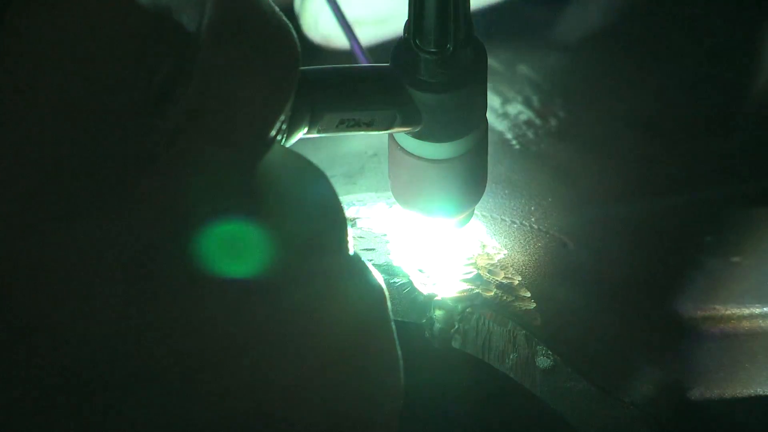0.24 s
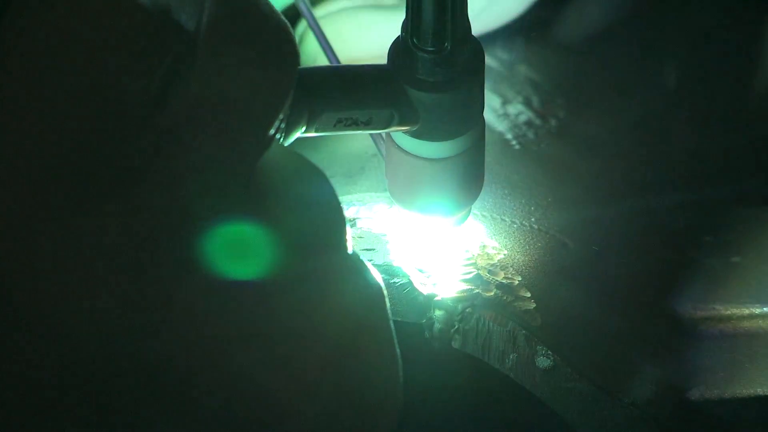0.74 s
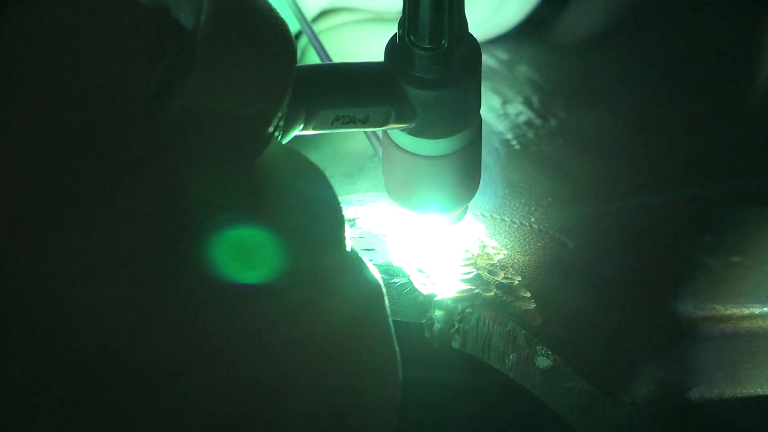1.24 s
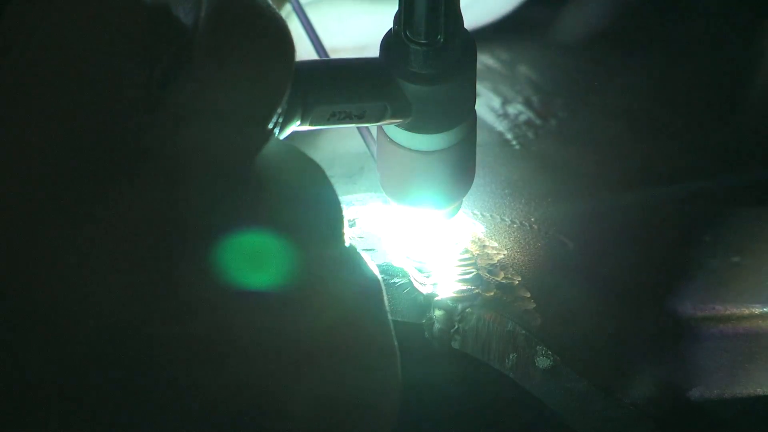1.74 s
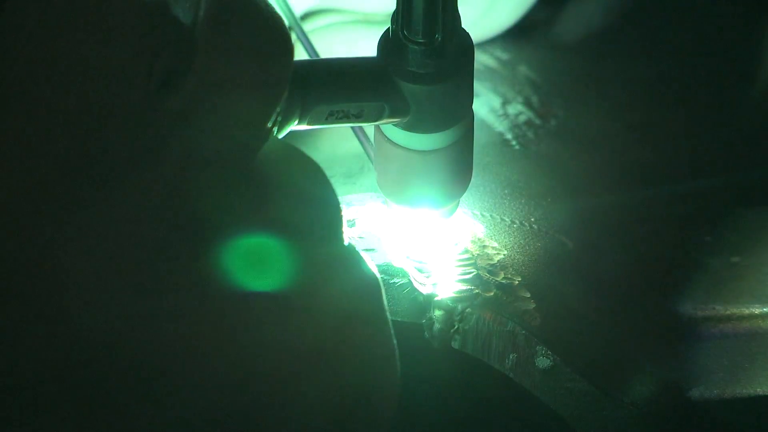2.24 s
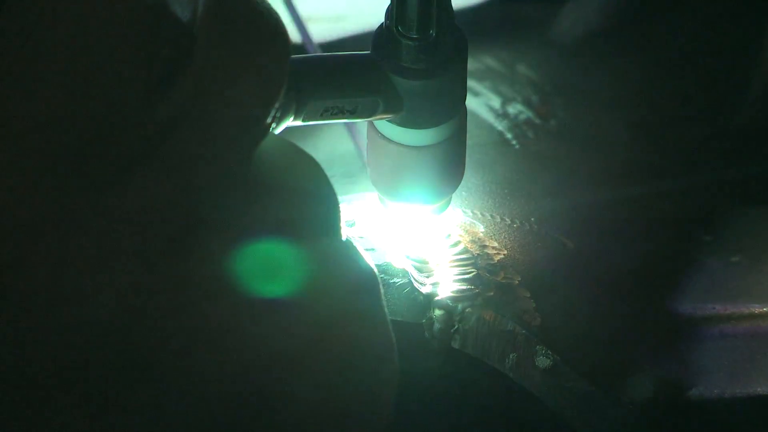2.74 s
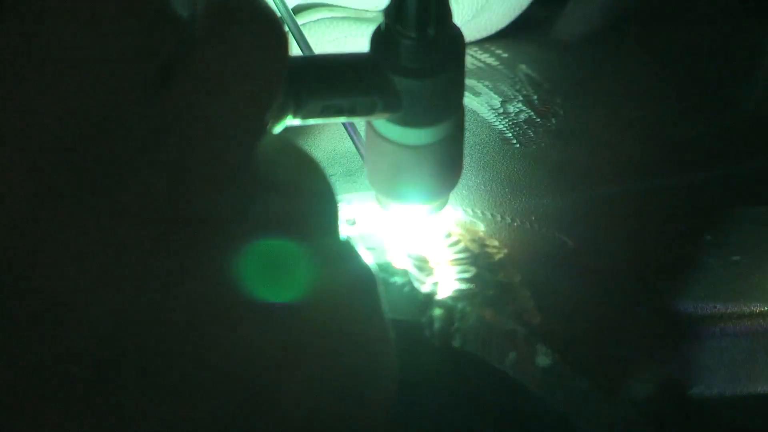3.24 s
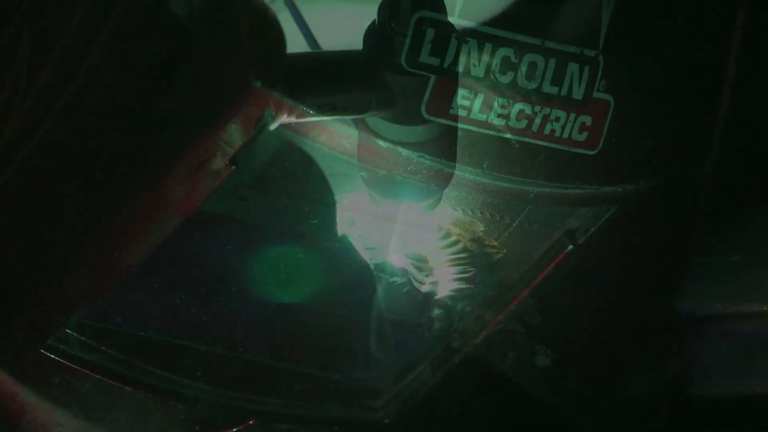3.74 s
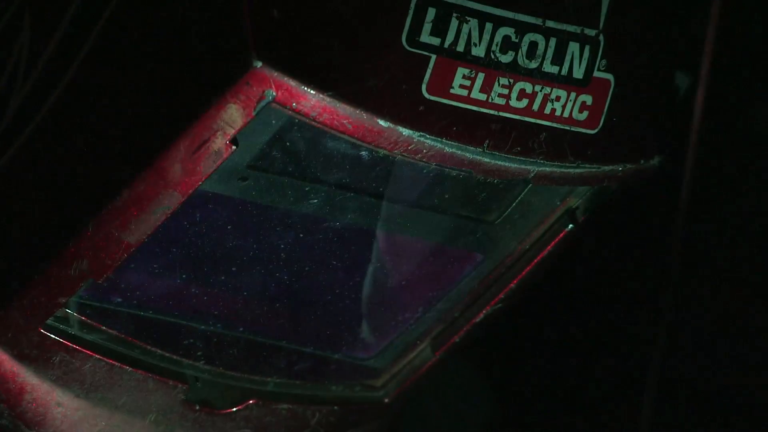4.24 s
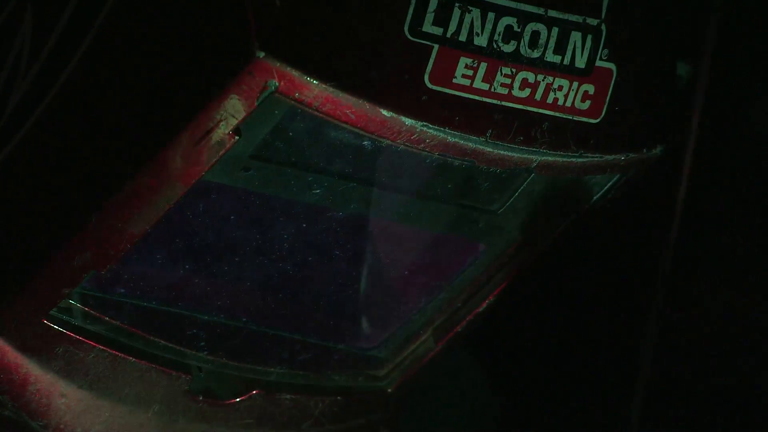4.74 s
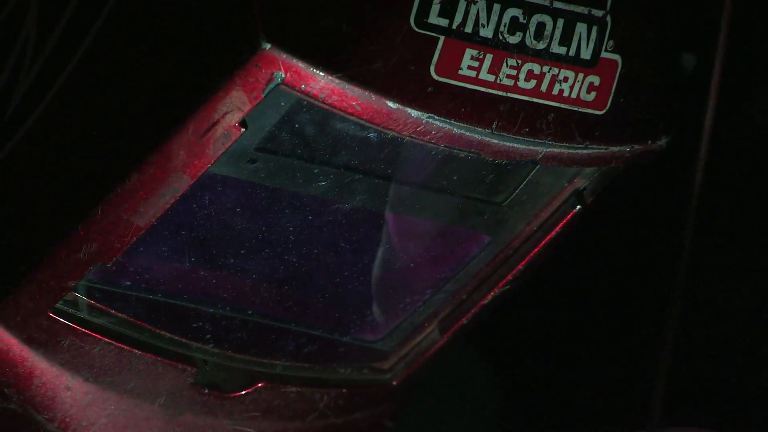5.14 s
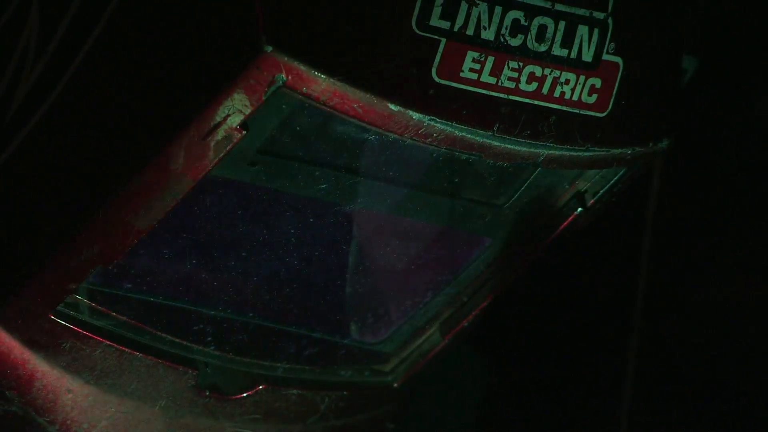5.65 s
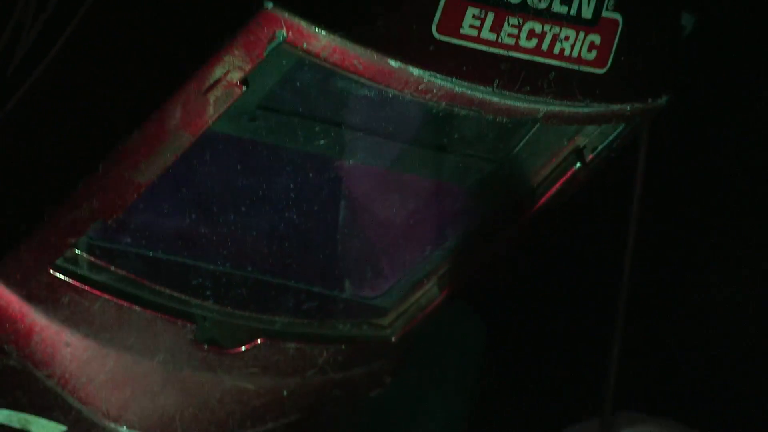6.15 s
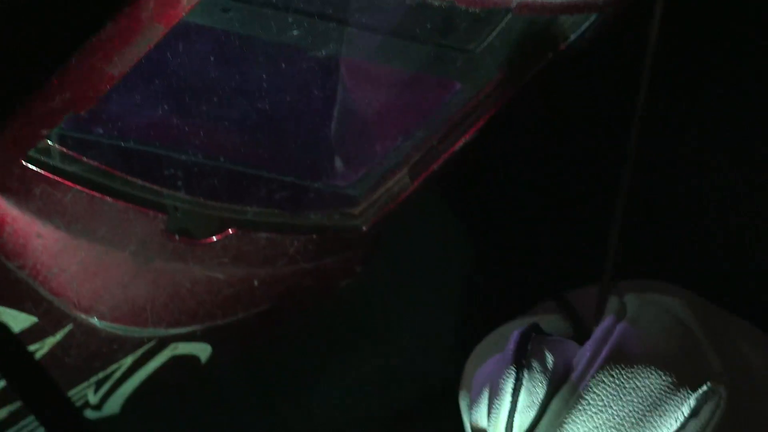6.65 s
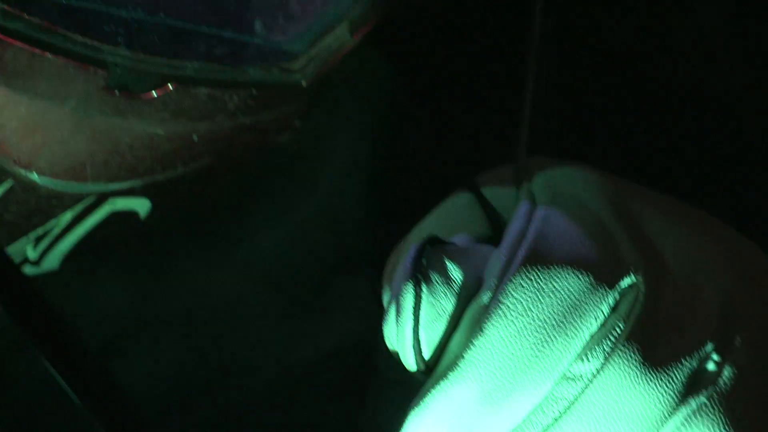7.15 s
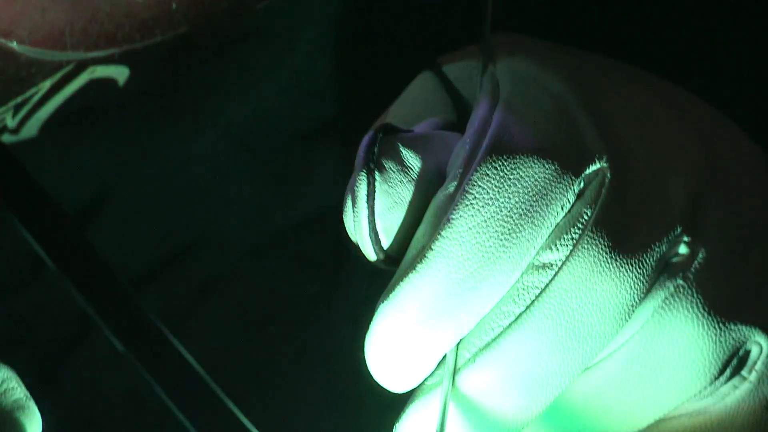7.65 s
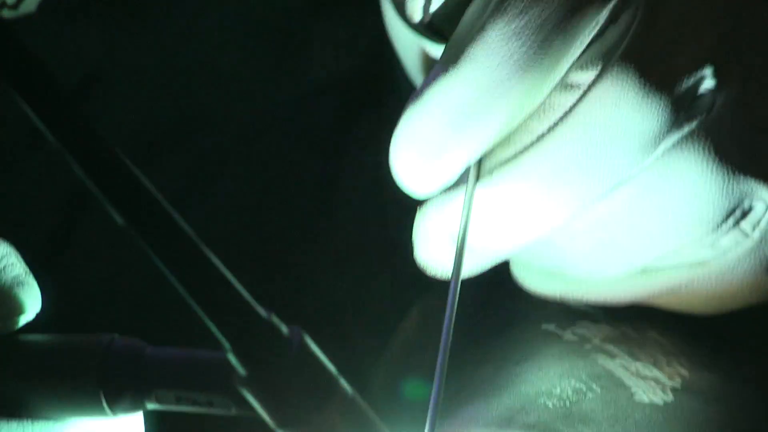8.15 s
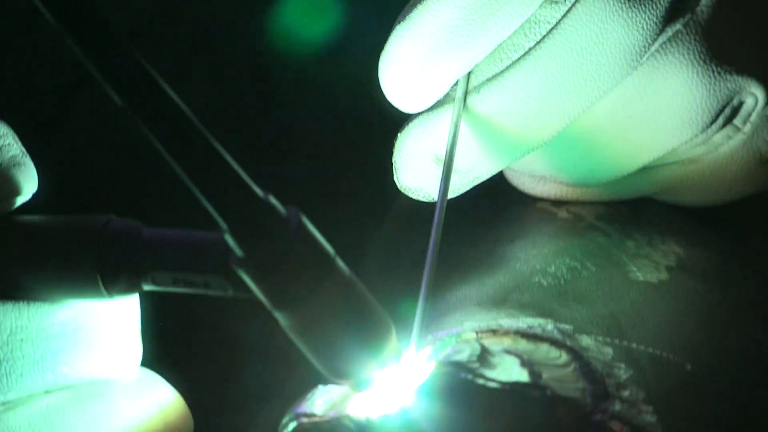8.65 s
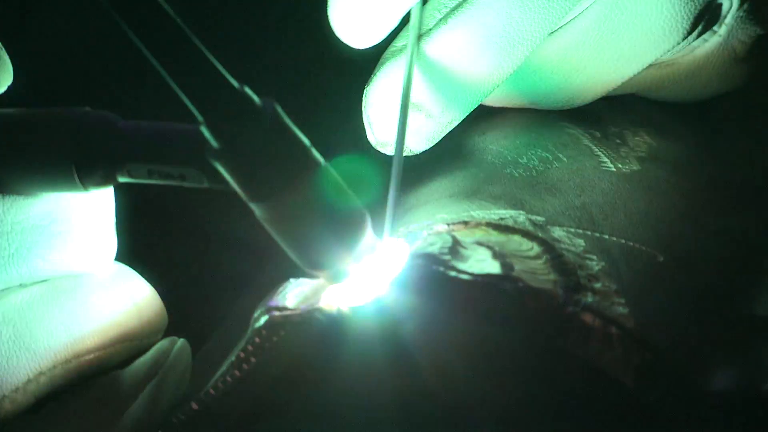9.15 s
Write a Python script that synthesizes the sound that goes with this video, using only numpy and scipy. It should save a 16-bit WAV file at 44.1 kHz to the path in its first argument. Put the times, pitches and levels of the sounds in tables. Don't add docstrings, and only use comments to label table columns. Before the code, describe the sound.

Close microphone beside an alternating-current welding torch: a dense, metallic, raspy buzz sits over a steady low hum, with hissing plasma on top and small dull pops scattered through it. The view changes between about three and a half and four seconds, crossfading to a crisper arc with a shorter echo. Later pops grow stronger. Faint workshop noise lies far underneath.

```python
import sys
import numpy as np
from scipy import signal
from scipy.fft import rfft, irfft
from scipy.io import wavfile

SR = 44100
rng = np.random.default_rng(int(sys.argv[2]) if len(sys.argv) > 2 else 0)


def dump(signal):
    limited = np.clip(np.atleast_2d(signal).T, -1, 1)
    pcm = np.round(limited * 32767).astype(np.int16)
    wavfile.write(sys.argv[1], SR, pcm)


def convert_level_to_amplitude(level_db):
    exponent = np.asarray(level_db, float) / 20
    return 10 ** exponent


N = 414099
T = np.arange(N) / SR

# cycles per second, first reversal in seconds,
# gap to the second reversal in seconds.
NEAR_TIMING = (116.1734, .0052, .00168)
FAR_TIMING = (116.172, .003545, .0017)
# time in seconds, peak in dB.
NEAR_STRONG_POPS = [(.0149, -23), (.2302, -28.5), (.325, -29), (.4542, -29.5), (.566, -27), (1.2198, -27),
                    (1.289, -25.5), (1.4608, -29.5), (1.5039, -29), (1.616, -28), (1.6851, -26.5),
                    (1.7366, -26.5), (1.7712, -27), (2.0205, -28), (2.597, -29), (2.7265, -26),
                    (2.7782, -26), (2.8208, -29), (2.8727, -28), (2.9073, -24), (3.0022, -28),
                    (3.0276, -30), (3.1824, -32), (3.2428, -27), (3.3374, -28), (3.389, -23.5),
                    (3.6817, -25.5), (3.6992, -35), (3.7163, -24), (3.7597, -30)]
FAR_STRONG_POPS = [(4.2851, -43), (4.377, -27), (4.4488, -25), (4.6297, -27), (4.9395, -28), (5.1632, -26),
                   (6.0241, -28), (6.1276, -28), (6.2197, -24.5), (6.4202, -32), (6.4779, -27),
                   (6.5208, -27), (7.3387, -23.5), (7.5306, -23), (7.6166, -22), (7.7459, -24),
                   (7.9067, -35), (7.9354, -27), (7.9929, -22.5), (8.1074, -28), (8.1764, -24),
                   (8.3141, -25.5), (8.3629, -25.5), (8.845, -24), (8.8711, -23), (9.1722, -26),
                   (9.1896, -29), (9.2435, -26), (9.2669, -24), (9.2867, -23)]


def in_time(rows):
    s, *columns = np.transpose(rows)
    return [np.interp(T, s, c) for c in columns]


def humps(at_s, heights, half_s):
    coarse_s = T[::64, None]
    bells = np.exp(-((coarse_s - at_s) / half_s) ** 2)
    return np.interp(T, coarse_s[:, 0], bells @ heights)


def rms_one(x):
    return x / np.sqrt(np.mean(x ** 2) + 1e-20)


def drift(rate_hz, at_s):
    r = np.exp(-2 * np.pi * rate_hz / 400)
    slow = signal.lfilter([1], [1, -2 * r, r * r], rng.standard_normal(6000))[2000:]
    return np.interp(at_s * 400, np.arange(4000), rms_one(slow - slow.mean()))


def causal(db):
    cepstrum = irfft(np.log(convert_level_to_amplitude(db)))
    half = len(cepstrum) // 2
    cepstrum[1:half] *= 2
    cepstrum[half + 1:] = 0
    return np.exp(rfft(cepstrum))


def coloured(x, spectrum, rings=()):
    hz, db = np.transpose(spectrum)
    grid_hz = np.maximum(np.fft.rfftfreq(8192, 1 / SR), 1)
    db = np.interp(np.log(grid_hz), np.log(hz), db)
    for ring_hz, width_hz, ring_db in rings:
        db = db + ring_db / (1 + (2 * (grid_hz - ring_hz) / width_hz) ** 2)
    return signal.fftconvolve(x, irfft(causal(db)))[:N]


def clicks(at_s, sizes):
    at = np.ravel(at_s)[:, None] * SR
    taps = np.floor(at).astype(int) + np.arange(-7, 9)
    shape = np.sinc(taps - at) * np.cos((taps - at) * np.pi / 16) ** 2
    heights = shape * np.ravel(sizes)[:, None]
    slots = np.clip(taps + 8, 0, N + 16)
    return np.bincount(slots.ravel(), heights.ravel(), N + 17)[8:N + 8]


def cycle_starts(timing):
    rate_hz, first_s, _ = timing
    return first_s + np.arange(-1, int(N / SR * rate_hz) + 1) / rate_hz


def workshop():
    # frequency in Hz, density in dB per Hz.
    shop_spectrum = [(20, -16), (50, -11), (100, -8), (200, -9), (400, -17), (1000, -6), (3000, -14.5),
                     (8000, -53), (16000, -45)]
    # time in seconds, draught level in dB.
    draught_curve = [
        (6.12, -80),
        (6.15, -43),
        (6.2, -52),
        (6.25, -60),
        (6.3, -52),
        (6.38, -53),
        (6.45, -80),
    ]
    swell_db = 1.5 * drift(2.5, T)
    floor = convert_level_to_amplitude(-50 + swell_db) * rms_one(coloured(rng.standard_normal(N), shop_spectrum))
    low_band = signal.butter(2, [30, 75], "band", fs=SR, output="sos")
    draught = signal.sosfilt(low_band, rng.standard_normal(N))
    return floor + convert_level_to_amplitude(in_time(draught_curve)[0]) * rms_one(draught)


def hollow(strikes, far):
    # frequency in Hz, level in dB, t60 in seconds, polarity.
    near_modes = [(219, -18.5, 0.062, -1.34), (373, -4, 0.048, 1), (466, -20, 0.022, -0.31),
                  (739, -1.5, 0.059, -0.77), (812, -6.5, 0.07, -1.38), (1213, -2.5, 0.04, 0.8),
                  (1920, -2, 0.0064, -1.9)]
    far_modes = [(195, -9.5, 0.041, -0.79), (376.3, 1.5, 0.034, 0.76), (450, 0.5, 0.09, -0.25),
                 (745, -3, 0.037, -1.06), (870, -7, 0.12, -0.32), (1190, 4, 0.0051, 1),
                 (1800, 7, 0.0036, -1.48)]
    soft = np.exp(-2 * np.pi * 1100 / SR)
    blows = signal.lfilter([1 - soft], [1, -soft], strikes + 1e-18)
    out = 0
    for share, modes in ((1 - far, near_modes), (far, far_modes)):
        for hz, db, t60_s, polarity in modes:
            r, w = convert_level_to_amplitude(-60 / (t60_s * SR)), 2 * np.pi * hz / SR
            push = [0, polarity * convert_level_to_amplitude(db) * np.sin(w)]
            out = out + signal.lfilter(push, [1, -2 * r * np.cos(w), r * r], share * blows)
    return out


def restrikes(far, sputter_db):
    # time in seconds, peak in dB.
    weak_pops = [(.43, -30), (.583, -29), (.63, -30), (1.2976, -37), (1.34, -34), (1.6763, -31),
                 (1.7796, -40), (2.6315, -33), (3.2252, -28), (3.31, -37), (3.7767, -29), (3.7854, -30),
                 (4.1907, -27), (4.2334, -34), (4.604, -29), (5.1805, -26), (5.6771, -35), (5.9552, -28),
                 (5.9725, -33), (6.0389, -24), (6.1593, -27), (6.351, -28), (6.5929, -30), (7.2608, -31),
                 (7.4529, -27), (7.9693, -37), (8.0122, -30), (8.8817, -25), (9.2238, -26), (9.2351, -26)]
    far_start = cycle_starts(FAR_TIMING)
    near_start = cycle_starts(NEAR_TIMING)[:len(far_start)]
    start = np.where(np.interp(far_start, T, far) < .5, near_start, far_start)
    chance = rng.random((len(start), 3))
    size = np.sign(chance[:, 0] - .4) * convert_level_to_amplitude(-5.0 * np.log(chance[:, 1] + 0.05))
    sputter = hollow(clicks(start + 0.0013 * chance[:, 2], size), far)
    pop_s, pop_db = np.transpose([*NEAR_STRONG_POPS, *FAR_STRONG_POPS, *weak_pops])
    cycle = np.searchsorted(start, pop_s) - 1
    pop_at_s = start[cycle] + 0.00008 * chance[cycle, 2]
    pops = hollow(clicks(pop_at_s, convert_level_to_amplitude(pop_db + 0.5)), far)
    return convert_level_to_amplitude(sputter_db) * rms_one(sputter) + pops


def hum(timing, orders, hum_db, fourth_db, heard):
    lead_s, fifth_share = .00014, 0.56
    rate_hz, first_s, _ = timing
    hum_db, fourth_db, heard_s = hum_db[heard], fourth_db[heard], T[heard]
    multiple, db = np.transpose(orders)
    response = causal(np.interp(np.arange(65), [0, *multiple, 24], [-30, *db, -45]))
    turn = 2 * np.pi * rate_hz * (heard_s - first_s + lead_s)
    unit = convert_level_to_amplitude(hum_db - .6) / np.sqrt(np.sum(convert_level_to_amplitude(db[9:17]) ** 2) / 2)
    out = np.zeros(N)
    for k in multiple.astype(int):
        level = np.abs(response[k]) * unit
        if k == 4:
            level = np.sqrt(2) * convert_level_to_amplitude(fourth_db + 2.5)
        if k == 5:
            level = level * convert_level_to_amplitude(fifth_share * np.maximum(fourth_db - hum_db + 4.0, 0))
        wander = 1 + 0.13 * drift(1.65, heard_s)
        out[heard] -= level * wander * np.cos(k * turn + np.angle(response[k]))
    return out


def near_hum(hum_db, fourth_db, heard):
    # multiple of the cycle rate, level in dB.
    near_orders = [(1, -4), (2, -7), (3, 4), (4, -5.5), (5, -8), (6, -0.5), (7, -7), (8, -8.5), (9, -20),
                   (10, 0), (11, -0.5), (12, -12.5), (13, -6.5), (14, -6.5), (15, -10.5), (16, -2.5),
                   (17, -5.5), (18, -16)]
    return hum(NEAR_TIMING, near_orders, hum_db, fourth_db, heard)


def far_hum(hum_db, fourth_db, heard):
    # multiple of the cycle rate, level in dB.
    far_orders = [(1, -14), (2, -14.5), (3, 3.5), (4, -1.5), (5, -6.5), (6, -4.5), (7, -7.5), (8, -12),
                  (9, -22), (10, -3.5), (11, -1), (12, -4.5), (13, -2), (14, -4), (15, -2.5), (16, -2.5),
                  (17, -10.5), (18, -8.5)]
    return hum(FAR_TIMING, far_orders, hum_db, fourth_db, heard)


def cracks(timing, echoes, unsteady, second, hiss_db, tail_db, low_t60_s, high_t60_s):
    start = cycle_starts(timing)
    shake = np.interp(start, T, np.clip(unsteady, 0, 2))[:, None]
    chance = rng.standard_normal((len(start), 4))
    at = start[:, None] + [0, timing[2]] + 2.5e-5 * shake * chance[:, :2]
    size = [-1, -second] * convert_level_to_amplitude(2.72 * shake * chance[:, 2:])
    direct = clicks(at, size)

    arrive = [at + ms / 1000 * (1 + 0.011 * drift(0.74, start)[:, None]) for ms, share in echoes]
    height = [size * share * convert_level_to_amplitude(0.47 * drift(3.6, start))[:, None] for ms, share in echoes]
    train = rms_one(clicks(arrive, height))

    lag_s = np.arange(SR // 8) / SR
    scatter = rng.standard_normal(len(lag_s)) * (lag_s > .0012)
    dull = signal.sosfiltfilt(signal.butter(2, 5500, fs=SR, output="sos"), scatter)
    fade = dull * convert_level_to_amplitude(-60 * lag_s / low_t60_s) + (scatter - dull) * convert_level_to_amplitude(-60 * lag_s / high_t60_s)
    tail = rms_one(signal.fftconvolve(direct, fade)[:N])

    cooling = np.exp(-1 / (0.0015 * SR))
    glow = .007 + np.abs(signal.lfilter([1], [1, -cooling], direct))
    hiss = rms_one(signal.lfilter([1, -.6], [1], glow * rng.standard_normal(N)))
    return train + convert_level_to_amplitude(tail_db) * tail + convert_level_to_amplitude(hiss_db) * hiss


def near_cracks(unsteady):
    # delay in ms, pressure share.
    near_echoes = [(0, 2.15), (0.248, 0.2), (0.311, -0.07), (0.442, -0.035), (0.701, 0.63), (0.829, 0.57),
                   (1.13, 0.74), (1.287, -0.39), (1.483, -0.017), (2.89, -0.18), (3.065, -0.68),
                   (4.15, -0.17)]
    # frequency in Hz, level in dB.
    near_colour = [(500, -80), (1200, 2.5), (2300, -1.5), (4000, -5), (6000, -3), (8000, -3), (11000, -9.5),
                   (14000, -21.5), (16000, -26)]
    # frequency in Hz, width in Hz, level in dB.
    near_rings = [(2215, 90, -7), (2500, 420, 7), (3020, 120, 11.5), (3270, 90, 10), (2850, 110, -11),
                  (3084, 190, -6.5), (3350, 110, 3.5), (4020, 140, 7), (4080, 150, 0), (3770, 80, 9),
                  (4310, 170, 9.5), (4910, 84, -9), (4660, 410, 10), (5400, 150, -6), (6280, 230, -11),
                  (6860, 170, 5.5), (10600, 500, -2), (12940, 1500, 9)]
    train = cracks(NEAR_TIMING, near_echoes, unsteady, second=1.76, hiss_db=-8.5, tail_db=-5.5,
                   low_t60_s=0.022, high_t60_s=0.035)
    return coloured(train, near_colour, near_rings)


def far_cracks(unsteady):
    # delay in ms, pressure share.
    far_echoes = [(0, 1.2), (0.096, 0.71), (0.239, 0.038), (0.316, 0.57), (0.493, 0.82), (0.547, 0.25),
                  (.592, 0.07), (0.748, 0.081), (.845, .3), (1.002, -0.032), (1.243, -0.28), (1.666, 0.02)]
    # frequency in Hz, level in dB.
    far_colour = [(500, -38.5), (1200, -25), (2300, -2.5), (4000, 2.5), (6000, -5.5), (8000, -1),
                  (11000, -1), (14000, -4.5), (15300, -4.5), (16000, -4)]
    # frequency in Hz, width in Hz, level in dB.
    far_rings = [(2410, 166, 2.5), (2575, 240, 8), (3160, 166, -1), (3010, 59, 0), (3520, 100, -5),
                 (4236, 320, 5.5), (5000, 94, -2.5), (4950, 230, 6.5), (7000, 260, 2), (9730, 390, 2.5),
                 (10160, 300, -8), (12200, 830, -3), (13020, 300, 6.5), (14400, 500, 2.5)]
    train = cracks(FAR_TIMING, far_echoes, unsteady, second=1.21, hiss_db=-9.0, tail_db=-6.5,
                   low_t60_s=0.014, high_t60_s=.013)
    return coloured(train, far_colour, far_rings)


def balanced(crack, crack_db, bright_db):
    low = signal.sosfiltfilt(signal.butter(2, 6500, fs=SR, output="sos"), crack)
    return convert_level_to_amplitude(crack_db) * (rms_one(low) + convert_level_to_amplitude(bright_db) * rms_one(crack - low))


def scene():
    # time in seconds, share of the far place 0-1.
    move_curve = [
        (0, 0),
        (3.3, 0),
        (3.5, .06),
        (3.81, .4),
        (3.86, .7),
        (4.55, .93),
        (4.6, 1),
        (9.4, 1),
    ]
    # time in seconds, crack in dB, brightness in dB,
    # unsteadiness 0-1.
    arc_curve = [(0, -38.5, 0.5, 0.54), (.2, -35, -2.5, 0.1), (.6, -34.5, -1, 0.37), (1.2, -36, -0.5, 0.07),
                 (1.55, -35, -2.5, 0.17), (2.15, -34, 2, 0), (2.75, -34, -3.5, 0.18), (3.25, -35, 2, 0.14),
                 (3.55, -37.5, -2, 0.32), (4.45, -34.5, 1, 0.2), (5.05, -30, 0.5, 0.37),
                 (5.35, -33, 2.5, 0.13), (5.65, -35.5, 2, 0.5), (6.1, -36.5, 2, 0.27),
                 (6.5, -29.5, 1, 0.03), (7.15, -35, 1, .25), (8.32, -31, 1.5, 0.26),
                 (9.39, -33.5, 1.5, 0.3)]
    # time in seconds, crack loss in dB,
    # half length in seconds.
    dabs = [(0.748, 1.5, 0.062), (1.054, 0, 0.07), (2.386, 2, 0.14), (2.616, 2.5, 0.039),
            (3.125, 1.5, 0.049), (4.74, 3, 0.16), (5, 3.5, 0.025), (5.662, 2, 0.052), (5.968, 2.5, 0.035),
            (7.8, 3, .05), (8.153, 1.5, 0.046), (8.41, 1.5, 0.04), (8.745, 1.5, 0.12), (8.996, 2.5, 0.059),
            (9.333, 3.5, 0.035)]
    # time in seconds, sputter gain in dB,
    # half length in seconds.
    flutters = [(0.033, 4, 0.093), (.45, 2, .2), (1.336, 7, 0.11), (1.6, 7, .2), (2.12, 4, 0.054),
                (2.62, 9, 0.13), (2.92, 4, 0.11), (3.3, 5, 0.22), (3.71, 7, 0.19), (4.29, 6.5, 0.29),
                (4.97, 6, 0.19), (5.688, 3, 0.11), (6.023, 6, .17), (6.45, 4.5, 0.18), (7.452, 6, 0.12),
                (7.93, 10.5, 0.059), (8.25, 3.5, .13), (8.852, 4, 0.11), (9.2, 6, 0.12)]
    # time in seconds, fourth order in dB over the hum.
    tuning_curve = [
        (0, -4.5),
        (3.3, -6.5),
        (3.45, -19),
        (3.72, -10),
        (3.9, -1.5),
        (4.15, 5),
        (4.5, 1),
        (5.0, -2.5),
        (9.39, -7),
    ]
    far = np.clip(in_time(move_curve)[0], 0, 1)
    height_db, colour_db, unsteady = in_time(arc_curve)
    dab_db = humps(*np.transpose(dabs))
    flutter_db = humps(*np.transpose(flutters))
    pop_s, pop_db = np.transpose([*NEAR_STRONG_POPS, *FAR_STRONG_POPS])
    unrest = np.tanh(humps(pop_s, convert_level_to_amplitude(pop_db + 27.5), 0.041))
    unsteady = unsteady + 0.083 * unrest

    crack_db = height_db - dab_db + 0.87 * unrest
    swing_db = crack_db + 34
    bright_db = -2.5 - 0.2 * swing_db + colour_db
    hum_db = -37.5 - 0.5 * far + 0.79 * swing_db + 0.03 * dab_db + 0.5 * unrest
    fourth_db = hum_db + in_time(tuning_curve)[0]
    hum_db = hum_db + 5.0 * unsteady * drift(9.4, T)
    sputter_db = -51.5 + 8.5 * far + flutter_db

    near = 1 - far
    moved = np.clip(far / .7, 0, 1)
    out = workshop() + restrikes(far, sputter_db)
    out = out + np.sqrt(near) * near_hum(hum_db, fourth_db, near > 0)
    out = out + np.sqrt(far) * far_hum(hum_db, fourth_db, far > 0)
    out = out + np.sqrt(1 - moved) * balanced(near_cracks(unsteady), crack_db, bright_db)
    out = out + np.sqrt(moved) * balanced(far_cracks(unsteady), crack_db, bright_db)
    return out[None]


def roll_off(x):
    return signal.sosfilt(signal.butter(12, 16800, fs=SR, output="sos"), x)


def record(dry):
    cut = signal.sosfilt(signal.ellip(10, .5, 48, 15850, fs=SR, output="sos"), dry)
    return roll_off(cut)


dry = scene()
out = record(dry)
dump(out)
```